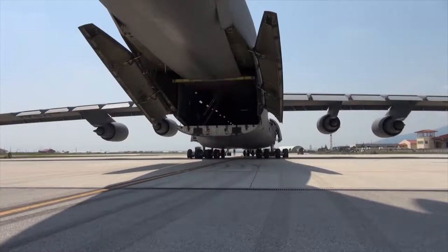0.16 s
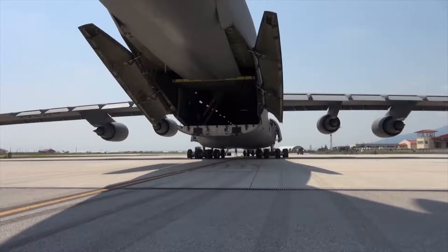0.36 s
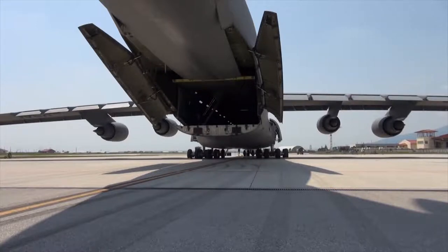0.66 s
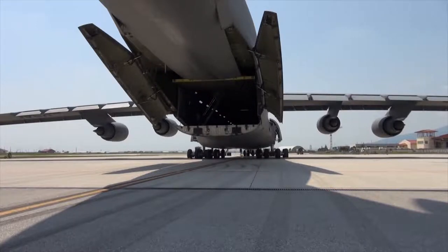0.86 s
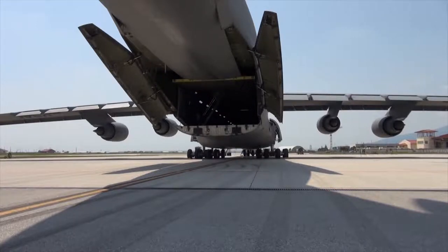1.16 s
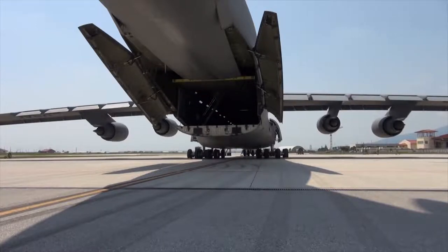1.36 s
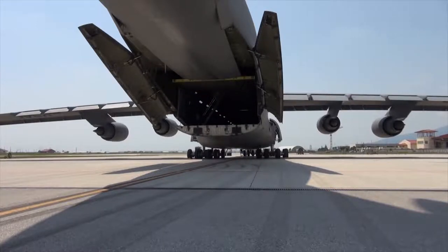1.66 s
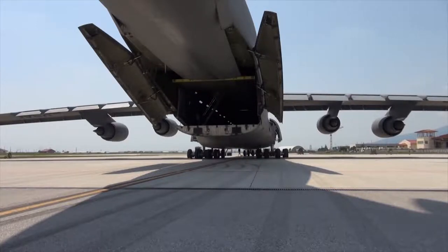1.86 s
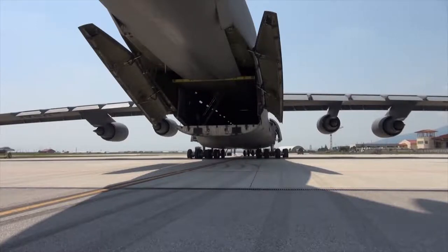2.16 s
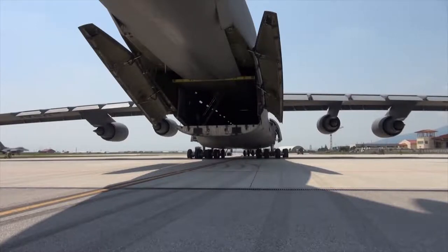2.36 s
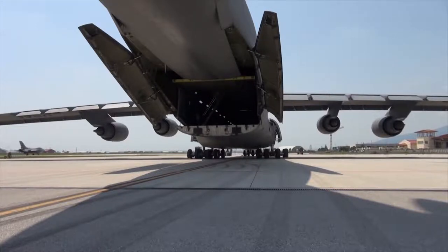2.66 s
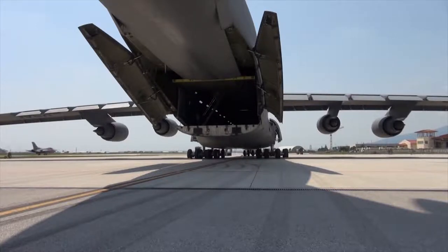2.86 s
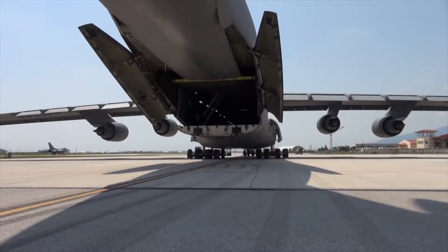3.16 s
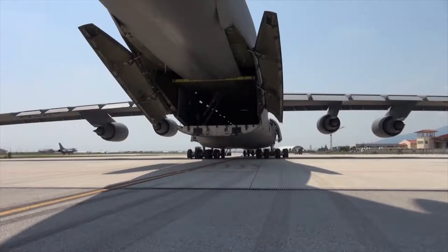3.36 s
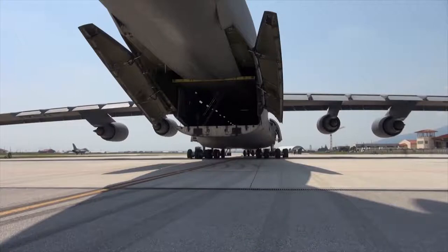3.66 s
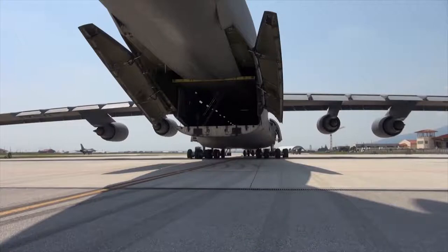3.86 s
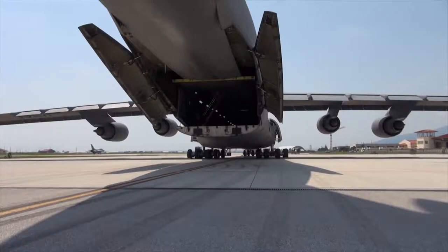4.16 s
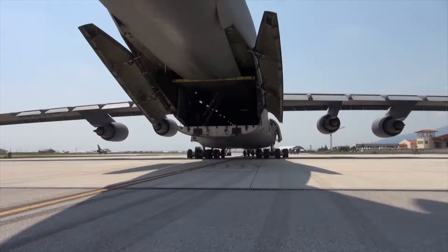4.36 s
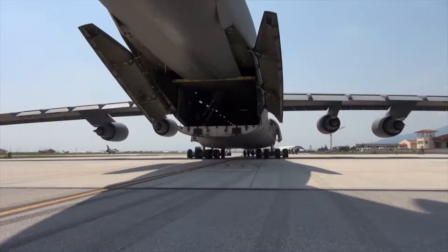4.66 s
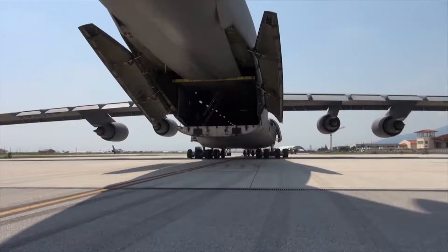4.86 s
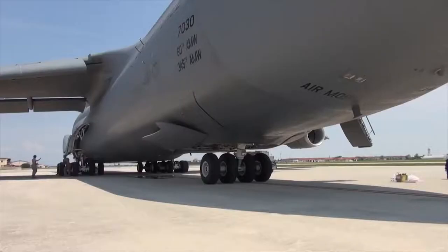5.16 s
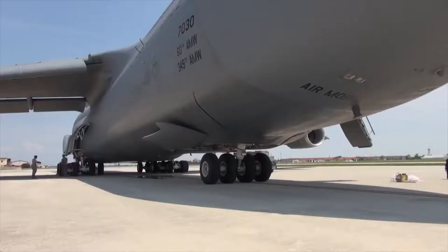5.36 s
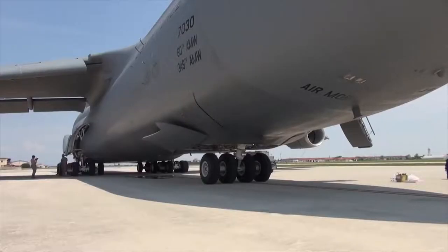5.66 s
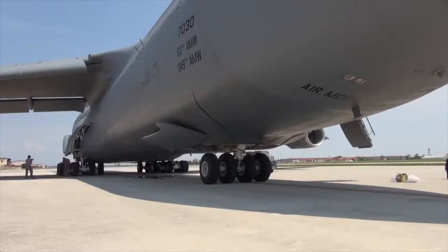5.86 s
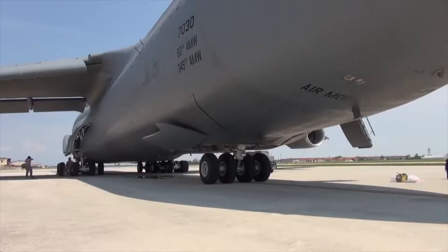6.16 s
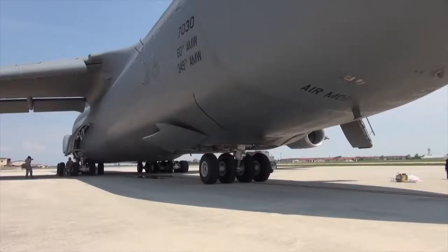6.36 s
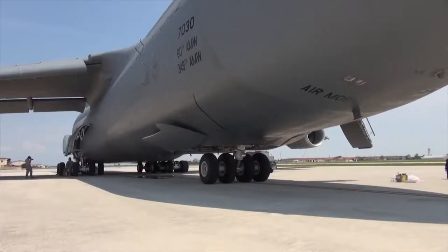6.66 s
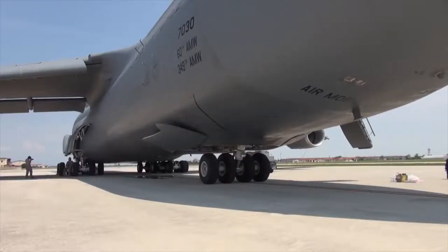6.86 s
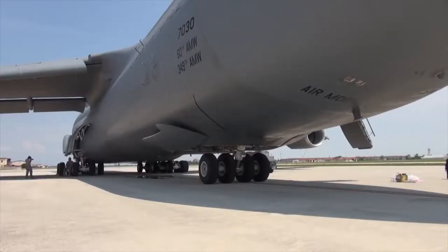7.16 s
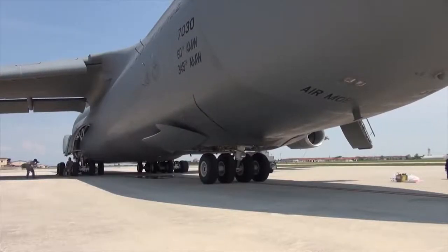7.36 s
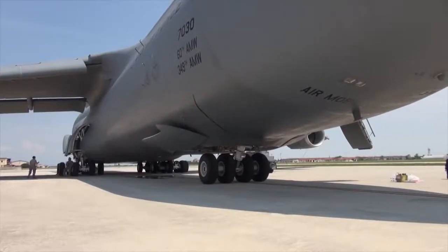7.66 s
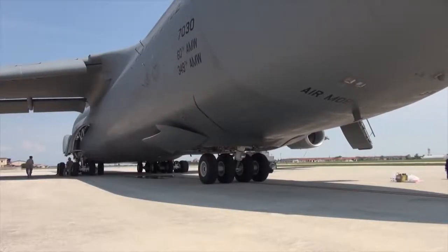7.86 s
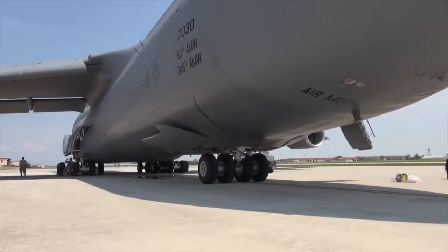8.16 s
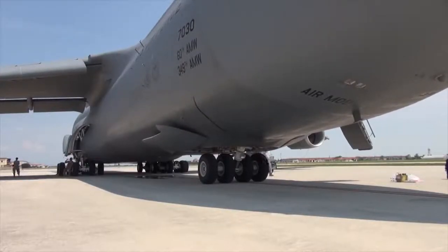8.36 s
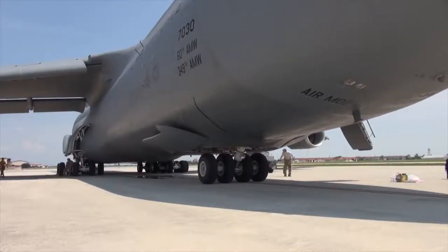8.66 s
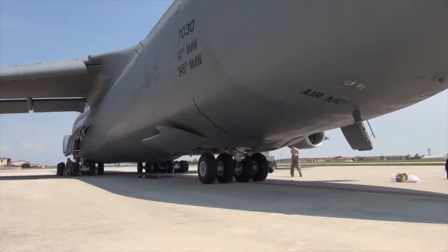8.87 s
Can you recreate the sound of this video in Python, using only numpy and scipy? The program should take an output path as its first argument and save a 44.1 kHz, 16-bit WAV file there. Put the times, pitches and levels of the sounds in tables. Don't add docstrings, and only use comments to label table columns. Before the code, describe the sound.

Broad turbine roar with a rough high whine behind a large aircraft, switching suddenly at mid-point to a softer bass-less hiss and high fan whine.

```python
import sys
import numpy as np
from scipy import signal
from scipy.fft import rfft, irfft, next_fast_len
from scipy.io import wavfile
from scipy.ndimage import uniform_filter1d

SR = 44100
rng = np.random.default_rng(int(sys.argv[2]) if len(sys.argv) > 2 else 0)


def volts(x):
    e = np.asarray(x, float) / 20
    return 10 ** e


def pcm_store(signal):
    levels = np.round(np.clip(np.atleast_2d(signal), -1, 1) * 32767)
    wavfile.write(sys.argv[1], SR, levels.astype(np.int16).T)


N = 397782


def rms_one(x):
    return x / np.sqrt(np.mean(x ** 2) + 1e-20)


def in_time(rows):
    s, *columns = np.transpose(rows)
    return [np.interp(np.arange(N) / SR, s, column) for column in columns]


def swells(rows):
    t = np.arange(0, N, 64) / SR
    rows = np.array(rows)
    centre, length = rows[:, :1], rows[:, 1:2]
    bells = np.exp(-((t - centre) / length) ** 2)
    return [np.interp(np.arange(N) / SR, t, db @ bells) for db in rows[:, 2:].T]


def drift(rate):
    hop = 40
    r = np.exp(-2 * np.pi * rate * hop / SR)
    sparse = rng.standard_normal(N // hop + 2002)
    slow = signal.lfilter([1], [1, -2 * r, r * r], sparse)[2000:]
    return np.interp(np.arange(N) / hop, np.arange(len(slow)), rms_one(slow))


def patches(shape, cells):
    field = rng.standard_normal(shape)
    for axis in (0, 1, 0, 1):
        field = uniform_filter1d(field, max(round(cells[axis]), 1), axis=axis)
    return rms_one(field)


def tone(hz, level_db, flutter_db, wobble_hz):
    turns = np.cumsum(hz + wobble_hz * drift(28.1)) / SR + rng.random()
    level = np.sqrt(2) * volts(level_db + flutter_db * drift(28))
    return level * np.sin(2 * np.pi * turns)


REGION_HZ = (70, 700, 4500, 11000)
# (time [s], frequency [Hz], width [Hz], length [s], level [dB])
GUSTS = [(.15, 4800, 1200, .11, 2.5), (.45, 3000, 900, .15, -1), (.95, 3700, 500, .15, 2),
         (1.35, 4000, 300, .1, 2), (2.38, 5400, 600, .17, 3.5), (2.32, 2100, 500, .12, 2),
         (2.7, 13500, 1200, .15, -1.5), (3.3, 5500, 900, .1, -1.5), (3.8, 2500, 250, .5, 2),
         (4.3, 5600, 500, .12, 2), (4.75, 3800, 80, .1, 3), (5.55, 5200, 700, .15, -3),
         (6.45, 5300, 400, .12, 1.5), (7.55, 5000, 600, .15, 2.5), (7.7, 9300, 800, .25, 1.5),
         (8.5, 5200, 600, .2, 2)]


def air_noise(spectrum, humps, wind, carry, follows, shared_db, broad_db, fine_db):
    size = next_fast_len(N)
    hz = np.arange(size // 2 + 1) * SR / size + 1e-3
    corner_hz, corner_db = np.transpose(spectrum)
    power = volts(np.interp(np.log(hz), np.log(corner_hz), corner_db, left=-90)) ** 2
    resonance = 1
    for centre_hz, width, db in humps:
        resonance = resonance + (volts(db) ** 2 - 1) / (1 + (2 * (hz - centre_hz) / width) ** 2)
    white = rfft(rng.standard_normal(size))
    noise = rms_one(irfft(white * np.sqrt(power * resonance), size)[:N])

    hz, s, cells = signal.stft(noise, SR, nperseg=2048, noverlap=1536)
    gain_db = 0
    for curve, share in ((wind, (1, 0, 0, 0)), (carry, (0, *follows))):
        times, db = np.transpose(curve)
        middle_db = np.mean(np.interp(np.linspace(times[0], times[-1], 50), times, db))
        share_at_hz = np.interp(np.log(hz + 1), np.log(REGION_HZ), share)
        gain_db += np.outer(share_at_hz, np.interp(s, times, db - middle_db))
    for at, gust_hz, width, length, db in GUSTS:
        region = np.exp(-((hz - gust_hz) / width) ** 2)
        gain_db += db * np.outer(region, np.exp(-((s - at) / length) ** 2))
    flicker = shared_db * patches((1, len(s)), (1, 3.0))
    flicker = flicker + broad_db * patches(cells.shape, (60.0, 3.0))
    flicker += fine_db * np.clip(7000 / (hz + 1), 0, 1)[:, None] * patches(cells.shape, (3.0, 22.0))
    gain_db += np.clip(hz / 1800, 0, 1)[:, None] * flicker
    return signal.istft(cells * volts(gain_db), SR, nperseg=2048, noverlap=1536)[1][:N]


def generator_hum():
    return tone(241.9, -59.5, flutter_db=2.0, wobble_hz=0.3)


def whistle(hz, width, level_db):
    r = np.exp(-np.pi * width / SR)
    poles = [1, -2 * r * np.cos(2 * np.pi * hz / SR), r * r]
    once = signal.lfilter([1, 0, -1], poles, rng.standard_normal(N))
    return volts(level_db) * rms_one(signal.lfilter([1, 0, -1], poles, once))


# (time [s], lower level [dB], upper level [dB])
WHISTLE_LEVELS = [(0.0, -45, -53), (0.37, -51, -51), (1.14, -48, -52), (4.86, -50, -53), (5.03, -47, -53),
                  (5.07, -57, -56)]
# (frequency [Hz], width [Hz], level within their band [dB])
WHISTLE_MODES = [
    (5690, 150, -3),
    (6984, 32, -4),
]


def duct_whistles():
    modes = zip(WHISTLE_MODES, in_time(WHISTLE_LEVELS))
    return sum(whistle(hz, width, share_db + band_db) for (hz, width, share_db), band_db in modes)


# (time [s], length [s], level [dB])
PUMP_FADES = [
    (.45, 0.33, -7),
    (1.3, .15, -4),
    (3.55, .08, -1),
    (4.4, .2, -3),
    (2.75, 0.17, -5),
    (3.24, .12, -2),
    (5.05, .1, -6),
]


def steady_pump():
    return tone(1688.5, -50 + swells(PUMP_FADES)[0], flutter_db=2.5, wobble_hz=2.0)


# (time [s], frequency [Hz])
HUNTING_HZ = [(0, 846), (.33, 829), (.48, 829), (.8, 847), (1.2, 844), (1.4, 829), (1.6, 842), (2.08, 865),
              (2.5, 846), (2.88, 826), (3.22, 858), (3.5, 841), (3.84, 818), (4.2, 848), (4.48, 835),
              (4.68, 815), (4.98, 843)]
# (time [s], length [s], tone rise [dB], octave rise [dB])
LOADS = [(.02, .08, 7, 7), (.38, 0.18, 11.5, 14.5), (.98, 0.11, 0, 12), (1.38, 0.14, 11, 14.5),
         (1.7, 0.16, 3, 9), (2.12, .22, 13.5, 1), (2.46, .07, -8, 11), (2.84, 0.14, 11, 16),
         (3.23, 0.078, 8, 8), (3.45, 0.18, 4, 2), (3.82, 0.26, 13.5, 14.5), (4.3, 0.097, 8, 13),
         (4.82, 0.19, 11, 19)]


def hunting_pump():
    hz, = in_time(HUNTING_HZ)
    first_db, octave_db = swells(LOADS)
    sound = tone(hz, -62 + first_db, flutter_db=2.5, wobble_hz=2.5)
    return sound + tone(2 * hz, -63 + octave_db, flutter_db=2.5, wobble_hz=3.0)


# (multiple, level [dB])
FAR_ORDERS = [
    (1, 0),
    (2, -1),
    (3, -8.5),
    (4, -1),
]


def far_fan():
    shade_s, shade_length_s, shade_db = 7.55, .5, -13
    far_db = -71 + shade_db * np.exp(-((np.arange(N) / SR - shade_s) / shade_length_s) ** 2)
    return sum(tone(multiple * 3710.6, far_db + db, flutter_db=2.0, wobble_hz=1.5)
               for multiple, db in FAR_ORDERS)


# (time [s], frequency [Hz])
FAN_HZ = [(5.08, 3808), (5.46, 3832), (5.64, 3809), (5.9, 3807), (6.06, 3817), (6.18, 3810), (6.58, 3824),
          (7.04, 3802), (7.37, 3830), (7.45, 3818), (7.52, 3829), (7.74, 3800), (8.0, 3825), (8.12, 3816),
          (8.21, 3834), (8.31, 3811), (8.5, 3821), (8.85, 3805)]
# (first [dB], second [dB], third [dB])
FAN_DB = (-54.5, -59.5, -66.5)
TWIN_DB = (-65, -64, -70)
# (time [s], length [s], first order [dB], second order [dB])
FAN_SWELLS = [(5.08, 0.088, -15, 6), (5.4, 0.15, -3, 5), (5.82, .2, -6, 6.5), (6.22, 0.16, -10, 2),
              (6.55, .2, 0.5, -9), (7.1, 0.13, -0.5, -4), (7.75, 0.14, -13, 1), (7.92, .05, 5, -5),
              (8.03, .04, -2, 4), (8.36, 0.046, -4, 0), (8.79, .05, -3, -3), (8.9, .2, 1.5, -7)]


def cooling_fans():
    hz, = in_time(FAN_HZ)
    twin_hz = 3815
    third_db = 2.5 * drift(3.8)
    sound = np.zeros(N)
    for k, db in enumerate(swells(FAN_SWELLS) + [third_db]):
        order = k + 1
        sound += tone(order * hz, FAN_DB[k] + db, flutter_db=2 + k, wobble_hz=2 * order)
        sound += tone(order * twin_hz, TWIN_DB[k], flutter_db=4.0, wobble_hz=1.69 * order)
    return sound


# (frequency [Hz], density [dB per Hz])
NOSE_SPECTRUM = [(18, -88), (30, -90), (163, -36.5), (460, -18.5), (612, -16.5), (815, -11.5), (1030, -11),
                 (1300, -2.5), (3500, -9), (3780, -11), (4090, -7.5), (5440, -3.5), (7240, -10.5),
                 (7830, -9.5), (15000, -13)]
# (frequency [Hz], width [Hz], level over the hiss [dB])
NOSE_HUMPS = [(1150, 180, 4.5), (2030, 150, 1), (2740, 90, 4.5), (3070, 85, 4.5), (4580, 280, 4),
              (5170, 120, -7), (5460, 360, 1.5), (6250, 130, 2.5), (8830, 89, 3.5)]
# (time [s], level [dB])
NOSE_WIND = [
    (5.2, -101),
    (8.45, -101.5),
    (8.6, -87),
    (9.02, -86),
]
# (time [s], level [dB])
NOSE_CARRY = [(5.15, -52.5), (5.52, -55.5), (6.74, -53.5), (7.13, -55.5), (7.6, -54), (8.3, -55.5),
              (8.38, -52), (8.67, -55), (9.02, -52.5)]
NOSE_FOLLOWS = (0.14, 0.64, 0.65)


def nose_hiss():
    echo_s, echo_share, echo_hz = 0.002347, 0.25, 3000
    hiss = air_noise(NOSE_SPECTRUM, NOSE_HUMPS, NOSE_WIND, NOSE_CARRY, NOSE_FOLLOWS,
                     shared_db=.6, broad_db=.6, fine_db=1.7)
    dull = signal.butter(2, echo_hz, fs=SR, output="sos")
    bounce = signal.sosfiltfilt(dull, np.roll(hiss, round(echo_s * SR)))
    return volts(-43.5) * (hiss + echo_share * bounce)


# (time [s], length [s], level [dB])
COMPRESSOR_FADES = [(0, .04, -15), (.66, .08, -6), (1.0, 0.19, -3), (1.36, .08, -4), (2.06, 0.094, -13),
                    (2.35, 0.066, 7), (2.48, .05, -5), (2.84, 0.063, -14), (3.25, .13, -13),
                    (3.59, .08, 5.5), (3.9, 0.085, -7), (4.2, .05, -2), (4.45, .05, 4), (4.62, 0.12, -13),
                    (5.02, .1, -3)]


def compressor_whine():
    return tone(9038, -47 + swells(COMPRESSOR_FADES)[0], flutter_db=3.5, wobble_hz=8.0)


# (frequency [Hz], density [dB per Hz])
TAIL_SPECTRUM = [(20, -40), (28, -23), (59, -11), (146, -12), (243, -5.5), (373, -4), (1150, -3),
                 (2130, -5), (3300, -4.5), (5570, -3.5), (7680, -7.5), (9770, -10), (13200, -17),
                 (15200, -21.5)]
# (frequency [Hz], width [Hz], level over the roar [dB])
TAIL_HUMPS = [(198, 25, 4), (279, 14, 4), (372, 28, 8), (408, 16, 3), (454, 14, 4), (477, 26, 7),
              (605, 110, 4), (2400, 60, 3), (9035, 450, 9), (9035, 110, 9)]
# (time [s], level [dB])
TAIL_WIND = [(0.0, -60.5), (0.72, -56.5), (1.39, -62), (1.78, -68), (2.37, -62), (3.14, -63.5), (3.3, -65),
             (5.04, -63)]
# (time [s], level [dB])
TAIL_CARRY = [(0.0, -38.5), (0.14, -35.5), (0.32, -37.5), (0.97, -36), (1.94, -37), (2.06, -38),
              (2.36, -37.5), (2.71, -37.5), (2.86, -36.5), (3.61, -38), (3.79, -36.5), (4.1, -38.5),
              (4.29, -36), (4.59, -37), (4.62, -36), (5.04, -37)]
TAIL_FOLLOWS = (0.067, 1.0, 0.59)
# (frequency [Hz], level [dB])
DULLING = [
    (1500, -5),
    (10500, -7),
]


def tail_roar():
    dull_from_s = 5.0475
    sound = volts(-33.5) * air_noise(TAIL_SPECTRUM, TAIL_HUMPS, TAIL_WIND, TAIL_CARRY, TAIL_FOLLOWS,
                                   shared_db=.5, broad_db=.6, fine_db=1.8)
    for hz, db in DULLING:
        high_pass = signal.butter(2, hz, "high", fs=SR, output="sos")
        treble = signal.sosfiltfilt(high_pass, sound)
        sound -= treble * (1 - volts(db)) * (np.arange(N) > dull_from_s * SR)
    return sound


def scene():
    beside_nose = far_fan() + cooling_fans() + nose_hiss()
    behind_tail = generator_hum() + duct_whistles() + steady_pump() + hunting_pump()
    behind_tail += compressor_whine() + tail_roar()
    fade = np.clip((np.arange(N) / SR - 5.0755) / 0.0012 + .5, 0, 1)
    return np.tile((1 - fade) * behind_tail + fade * beside_nose, (2, 1))


def apart(mono, level_db):
    side, size = np.zeros(N), 2048
    hop, start = 1024, 972
    hz = np.arange(size // 2 + 1) * SR / size
    patches_per_s = 5.6
    for when, where, wide in rng.random((round(patches_per_s * N / SR), 3)):
        i = start + hop * int(when * (N // hop - 3))
        low_hz = np.interp(where, (0, 1), (4100, 14400))
        width_hz = np.interp(wide, (0, 1), (900, 2100))
        band = (hz > low_hz) * (hz < low_hz + width_hz)
        block = rfft(mono[i:i + size] * np.hanning(size) ** .5) * band
        scrambled = block * np.exp(2j * np.pi * rng.random(len(hz)))
        side[i:i + size] += irfft(scrambled) * np.hanning(size)
    return volts(level_db) * side


def roll_off(x):
    return signal.sosfilt(signal.butter(12, 15150, fs=SR, output="sos"), x)


def record(dry):
    rounded = .2 * np.tanh(dry / .2)
    low_pass = signal.ellip(10, .3, 40, 15020, fs=SR, output="sos")
    cut = signal.sosfilt(low_pass, rounded)
    mix = cut + apart(cut[0], level_db=1.0) * [[1], [-1]]
    return roll_off(mix)


dry = scene()
out = record(dry)
pcm_store(out)
```